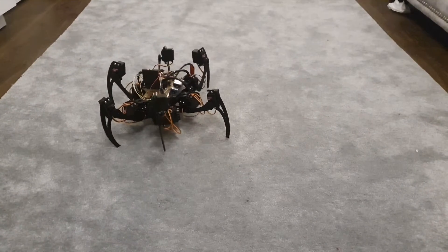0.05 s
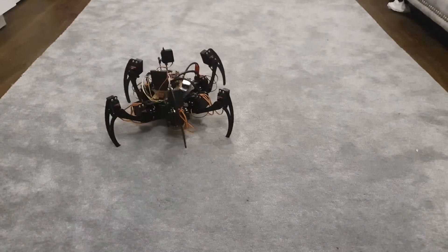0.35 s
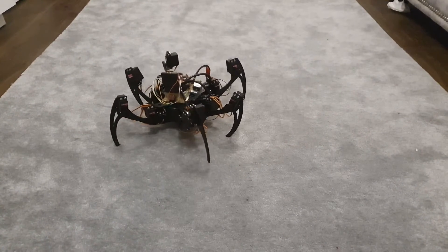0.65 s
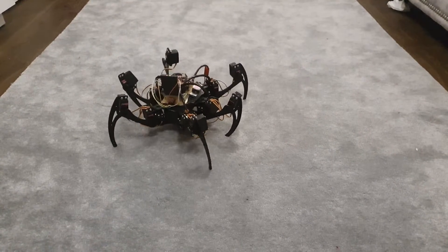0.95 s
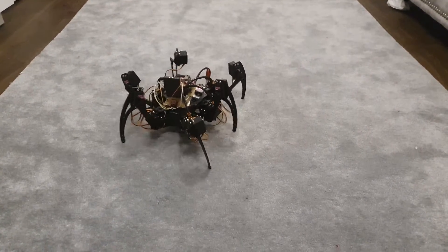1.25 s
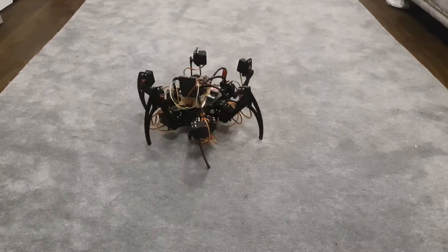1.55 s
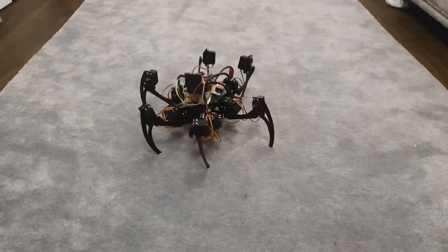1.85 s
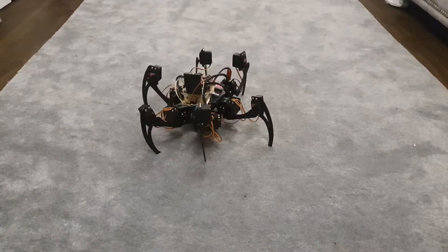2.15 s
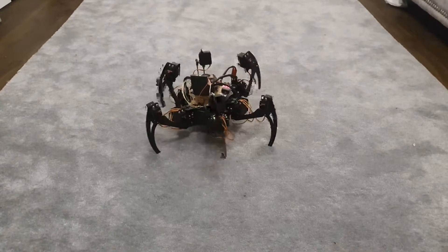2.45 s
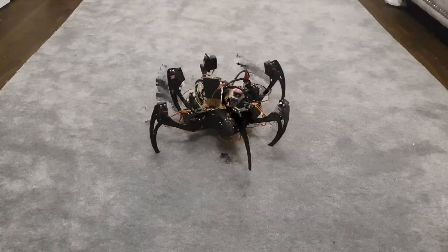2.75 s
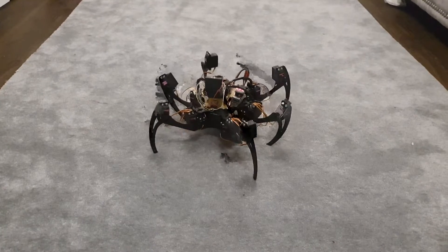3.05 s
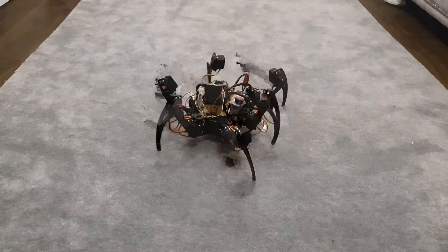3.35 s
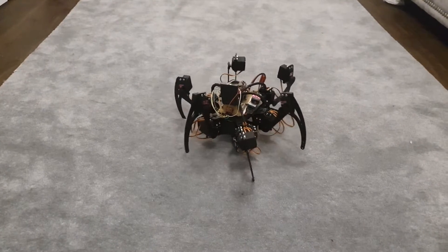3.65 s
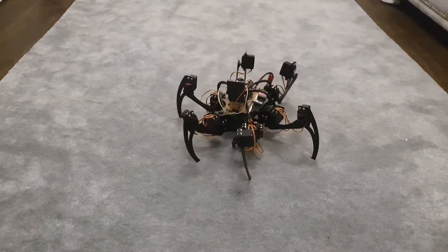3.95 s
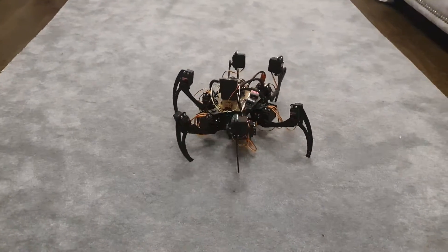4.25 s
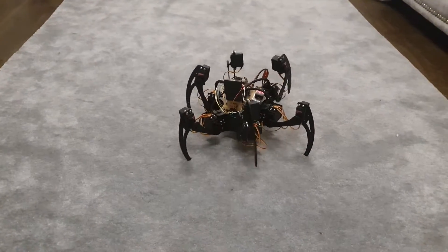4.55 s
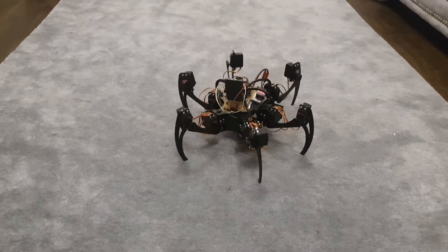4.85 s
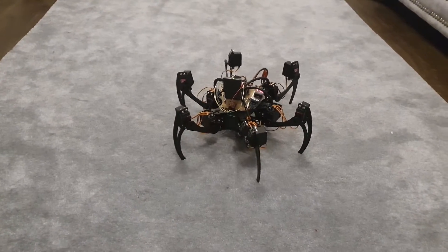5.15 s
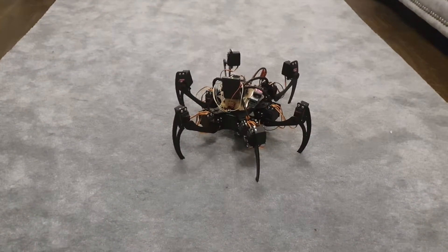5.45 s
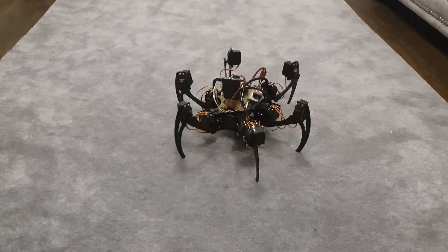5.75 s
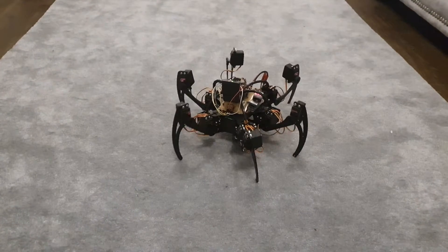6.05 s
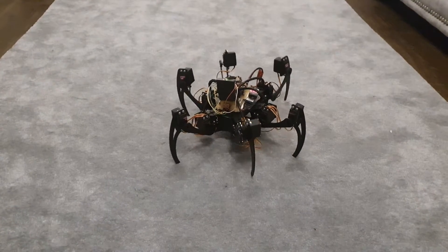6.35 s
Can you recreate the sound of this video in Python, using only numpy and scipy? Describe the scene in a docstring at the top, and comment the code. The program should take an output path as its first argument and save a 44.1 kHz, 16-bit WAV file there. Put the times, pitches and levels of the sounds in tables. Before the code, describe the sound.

A walking robot's servos whir in gritty surges, with light ticks and soft footfalls, halting for a second before resuming.

```python
"""Small motors rasp and whine as a six-legged robot walks over a mat in a living room.
It halts for a second, then steps off again. The rasp is gear teeth rattling in the small cases
of its servos, the motors that move the legs. Feet tick, a joint creaks, and twice the feet land
hard enough to set the floor booming. A faint hum fills the room."""
import sys
import numpy as np
from scipy import signal
from scipy.fft import rfft, irfft
from scipy.io import wavfile
from scipy.ndimage import uniform_filter1d, map_coordinates

SR = 44100
rng = np.random.default_rng(int(sys.argv[2]) if len(sys.argv) > 2 else 0)


def transcribe(signal):
    """Save signal, clipped to [-1, 1], as a 16-bit WAV file at the path in sys.argv[1]."""
    frames = np.atleast_2d(signal).T
    limited = np.clip(frames, -1, 1)
    pcm = np.round(limited * 32767).astype(np.int16)
    wavfile.write(sys.argv[1], SR, pcm)


N = 282240
T = np.arange(N) / SR
HZ = np.maximum(np.fft.rfftfreq(N, 1 / SR), 1)


def from_db(db):
    """Turn decibels into a number to multiply a sound by."""
    return 10 ** (np.asarray(db) / 20)


def unit_power(x):
    """Scale a sound so that its average power is 1."""
    return x / np.sqrt(np.mean(x ** 2) + 1e-20)


def over_time(rows):
    """Join a table's points in time with straight lines, one curve per column."""
    times_s, *columns = np.transpose(rows)
    return [np.interp(T, times_s, column) for column in columns]


def over_hz(points):
    """Join a table's points to get a value at every frequency."""
    hz, value = np.transpose(points)
    return np.interp(np.log(HZ), np.log(hz), value)


def colour(x, gain):
    """Turn each frequency of a sound up or down."""
    return irfft(rfft(x) * gain, N)


def drift(rate_hz):
    """A smooth random wobble, about 1 in size."""
    r = np.exp(-2 * np.pi * rate_hz / SR)
    white = rng.standard_normal(N + SR // 2)
    return unit_power(signal.lfilter([1], [1, -2 * r, r * r], white)[-N:])


def ring(blows, pitch_hz, fade_s):
    """Each blow starts a tone that dies away by 60 dB in fade_s."""
    r, w = from_db(-60 / (fade_s * SR)), 2 * np.pi * pitch_hz / SR
    return signal.lfilter([0, np.sin(w)], [1, -2 * r * np.cos(w), r * r], blows + 1e-18)


def glide(rows, flutter, pitch_ratio=1):
    """An unsteady tone that follows rows of time_s, pitch_hz, level_db."""
    hz, db = over_time(rows)
    sounding = (T > rows[0][0]) & (T < rows[-1][0])
    unsteady_hz = pitch_ratio * hz * (1 + flutter * drift(300))
    return sounding * from_db(db) * np.sin(2 * np.pi * np.cumsum(unsteady_hz) / SR)


def two_ears(mid, side, likeness):
    """Mix two unrelated sounds into left and right: likeness 0 is unrelated, 1 nearly the same."""
    likeness = np.clip(likeness, -.99, .99)
    return colour(mid, np.sqrt(1 + likeness)) + colour(side, np.sqrt(1 - likeness)) * [[1], [-1]]


def noise(spectrum, likeness):
    """Stereo noise of power 1, shaped by a table of frequencies and levels."""
    white = two_ears(*rng.standard_normal((2, N)), likeness)
    return unit_power(colour(white, from_db(over_hz(spectrum))))


# The tone of the still room: frequency_hz, relative_db
AIR_SPECTRUM = [(30, -14), (55, 0), (130, -6), (200, -7), (300, -15), (500, -19.5), (900, -19.5),
                (1400, -18), (2150, -14), (3000, -19), (4500, -22), (7500, -29.5), (10500, -27.5),
                (14000, -29)]

def still_air():
    """The soft, even hush of the room."""
    return from_db(-80.5) * noise(AIR_SPECTRUM, likeness=0.04)


def room_hum(walking, pitch_hz=92):
    """A low, wavering hum that swells while the robot walks."""
    level = from_db(-86.5) + from_db(-77.5) * walking * (1 + .7 * drift(2.1))
    return level * np.sin(2 * np.pi * pitch_hz * T + .7 * drift(12))


def room(x, echo_db, fade_s=0.28):
    """Add the many echoes off the walls, different at each ear."""
    t = T[:SR // 2]
    tail = rng.standard_normal((2, len(t))) * from_db(-60 * t / fade_s) * (t > .004)
    tail /= np.sqrt(np.sum(tail ** 2, axis=1, keepdims=True))
    return x + from_db(echo_db) * signal.fftconvolve(x * np.ones((2, 1)), tail, axes=1)[:, :N]


def moving_room(x, echo_db, places=4):
    """The echoes change as the robot moves from place to place."""
    position = T / T[-1] * (places - 1)
    nearness = [np.clip(1 - np.abs(position - k), 0, 1) for k in range(places)]
    return x + sum(np.sqrt(near) * (room(x, echo_db) - x) for near in nearness)


# The tone of the shaking floor: frequency_hz, relative_db
RUMBLE_SPECTRUM = [(20, -20), (45, 5.5), (70, 32), (95, 37.5), (125, 18), (200, 14), (300, -90), (600, -93)]

def floor_rumble(walking):
    """The walking frame shakes the floor unevenly."""
    shaking = from_db(3.5 * drift(10))
    return from_db(-72) * walking * noise(RUMBLE_SPECTRUM, likeness=0.7) * shaking


def frame_sway(halt_s=4.9):
    """The stopped frame rocks on its legs with a low tone that dies away."""
    jolt = np.arange(N) == round(halt_s * SR)
    return from_db(-52) * ring(jolt, pitch_hz=68, fade_s=.95)


# The course of one creak: time_s, pitch_hz, level_db
CREAK_CURVE = [(.15, 405, -92), (.2, 422, -73), (.27, 418.5, -65), (.36, 429, -79), (.43, 420, -100)]

def joint_creak():
    """A leg joint creaks briefly."""
    return glide(CREAK_CURVE, flutter=0.024)


# Feet landing on the mat: start_s, push_db, sharpness_hz
LANDINGS = [(.343, -70, 1515), (.375, -68.5, 895), (0.827, -42, 500), (0.842, -32.5, 450),
            (.849, -33, 410.7), (0.862, -35, 407), (0.88, -38, 121), (0.936, -44, 500),
            (3.139, -61.5, 2500), (3.151, -66, 900), (1.038, -40.5, 71.55), (4.102, -37, 54.6),
            (4.127, -41, 55.6), (4.19, -77, 500), (4.821, -39.5, 92), (4.865, -53, 900),
            (4.888, -43.5, 1300), (4.9, -38.5, 250), (4.935, -37, 210)]
# The notes that frame and floor ring at: pitch_hz, gain_db, fade_s
FLOOR_NOTES = [(88, -10, 0.082), (116.7, -11.5, 0.06), (166, -10, 0.062), (210, -14.5, 0.22),
               (295, -8, 0.083), (346, -12.5, 0.045), (402, -7, 0.025), (500, -11.5, 0.034),
               (647, -3, 0.032), (850, -5.5, .045), (965, -5.5, 0.023), (1210, 0.5, 0.024)]

def footfalls(scuff_size=.05, scuff_s=.012):
    """A padded blow, and a scuff as the foot takes weight, set frame and floor ringing."""
    push, t = np.zeros(N), T[:SR // 6]
    scuff_shape = scuff_size * np.sqrt(t / scuff_s) * np.exp(-t / scuff_s)
    for start_s, push_db, sharpness_hz in LANDINGS:
        blow = (t == 0) + scuff_shape * rng.standard_normal(len(t))
        padding = signal.butter(2, sharpness_hz, fs=SR, output="sos")
        at = round(start_s * SR)
        push[at:at + len(t)] += from_db(push_db) * signal.sosfilt(padding, blow)[:N - at]
    return sum((-1) ** k * from_db(gain_db) * ring(push, pitch_hz, fade_s)
               for k, (pitch_hz, gain_db, fade_s) in enumerate(FLOOR_NOTES))


# Feet and joints ticking: start_s, level_db, lowest_hz
PLASTIC_TICKS = [(.343, -38, 1200), (.939, -37, 1100), (2.876, -43, 3000), (3.141, -37, 1300),
                 (3.150, -39, 1100), (3.343, -39, 3800), (3.557, -38, 3800), (3.734, -38, 3800),
                 (3.752, -40, 3800)]

def ticks(fade_s=.012, highest_hz=7000):
    """Hard plastic parts knock together with a brief, bright crack."""
    out, grit = 0, rng.standard_normal(N)
    for start_s, level_db, lowest_hz in PLASTIC_TICKS:
        crack = from_db(level_db - 60 * np.clip(T - start_s, 0, 1) / fade_s) * (T >= start_s) * grit
        band = signal.butter(2, [lowest_hz, highest_hz], "band", fs=SR, output="sos")
        out = out + signal.sosfilt(band, crack + 1e-18 * grit)
    return out


# One motor swinging a leg at full speed: start_s, length_s, top_pitch_hz, level_db
LEG_SWINGS = [(2.14, .30, 2347, -56.5), (2.2, 0.2, 2550, -65), (2.791, .14, 2376, -56),
              (3.928, 0.088, 2385, -57), (4.30, .22, 2320, -58.5), (4.34, 0.17, 2510, -56.5)]

def motor_whine(pitch_droop=0.06, second_gear_db=-2):
    """A motor speeds up and slows down; a second gear stage whines about half an octave higher."""
    out, arc = 0, np.linspace(-1, 1, 15)  # -1 is the start of the swing, 1 its end
    for start_s, length_s, top_pitch_hz, level_db in LEG_SWINGS:
        time_s = start_s + length_s * (arc + 1) / 2
        pitch_hz = top_pitch_hz * (1 - pitch_droop * arc ** 2)
        curve = np.transpose([time_s, pitch_hz, level_db - 20 * arc ** 4])
        out = out + glide(curve, flutter=.04)
        out = out + from_db(second_gear_db) * glide(curve, flutter=.04, pitch_ratio=1.45)
    return out


def move(start_s, rise_s, hold_s, fall_s, surge_db=0, first_command_s=.06, command_gap_s=.0669):
    """A servo eases in, holds and runs down, surging each time it is told a new position."""
    t = T - start_s
    surge = from_db(surge_db * np.cos(2 * np.pi * (T - first_command_s) / command_gap_s))
    run_up = np.sin(np.pi / 2 * np.clip(t / rise_s, 0, 1)) ** 2
    run_down = np.exp(-np.clip((t - rise_s - hold_s) / fall_s, 0, 10) ** 2)
    return run_up * surge * run_down


# Five kinds of move, each with: start_s, rise_s, hold_s, effort_db, growl_db, hiss_db, ring_db
# Effort is the rasp's level. Slow-gear growl, tooth hiss and case ring are relative to it.
STRIDE_MOVES = [(-.06, .05, .93, -50, -13, -1, -16), (.97, .10, .91, -48.5, -14.5, -2.5, -22),
                (2.073, .008, 1, -49.5, -13, -2.5, -6), (3.13, .03, 0.37, -49.5, -13.5, -1.5, -17),
                (3.59, .07, .11, -47.5, -16, -5, -39), (4.21, .03, .63, -49, -21.5, -8, -11.5),
                (6.042, .06, 0.17, -53, -11, -4, -27), (6.355, .03, .05, -51, -21, -7, 4)]  # the standing legs push the body along
LIFT_MOVES = [(-.07, .13, .11, -43.5, -19, -8.5, -8), (1.02, .06, .07, -44, -18, -2, -14),
              (2.09, .12, .13, -42, -25, -9, -3), (3.17, .05, .30, -45.5, -17.5, -8.5, -9),
              (4.28, .04, .2, -43, -18.5, -6.5, -2.5)]  # three legs lift and swing forward
LOWER_MOVES = [(.50, .30, .11, -46, -10, -5.5, -10), (1.65, .16, .17, -47.5, -8.5, -6, -18),
               (2.65, .25, .14, -46.5, -14, -3, -14), (3.77, .19, .18, -46.5, -8.5, -2.5, -31)]  # they reach down to the mat again
JERK_MOVES = [(1.03, .035, .005, -44.5, -15.5, 0.5, -23), (3.182, .028, .008, -42.5, -15, -1, -12),
              (4.68, .065, .13, -43.5, -7, -2, -13), (4.74, .08, .05, -39, -10.5, -2.5, -24.5),
              (5.836, .08, .027, -40, -11.5, -2, -26), (5.93, .04, .04, -46.5, -6.5, 1, -15),
              (6.04, .165, .01, -45, -8.5, -2, -34), (6.22, 0.024, .04, -50, -5.5, -1, -8)]  # quick jerks to set off or square up
HOLD_MOVES = [(-.1, .05, 4.92, -59, -9, -5, -14.5), (5.74, .08, .03, -82, -5, 4, -20),
              (5.85, .08, .5, -58, -28, -9, -19)]  # the motors keep adjusting their position between moves
STRIDE_FALL_S = .055

def leg_work(idle_db=-100):
    """Add up the power of all moves: effort in dB, then growl, hiss and ring relative to it."""
    # moves, fall_s, surge_db
    kinds = [(STRIDE_MOVES, STRIDE_FALL_S, 0.33), (LIFT_MOVES, .15, 0.16), (LOWER_MOVES, .045, 1.8),
             (JERK_MOVES, .05, 0), (HOLD_MOVES, STRIDE_FALL_S, 0)]
    power = from_db(idle_db) ** 2
    for moves, fall_s, surge_db in kinds:
        for start_s, rise_s, hold_s, effort_db, *tone_db in moves:
            effort = from_db(effort_db) * move(start_s, rise_s, hold_s, fall_s, surge_db)
            power = power + np.outer(from_db([0, *tone_db]), effort) ** 2
    total_db, *parts_db = 10 * np.log10(power)
    return total_db, *(parts_db - total_db)


def weight_shift():
    """How hard the standing legs press on the floor, 1 at the strongest push."""
    push = sum(from_db(effort_db) * move(start_s, rise_s, hold_s, STRIDE_FALL_S)
               for start_s, rise_s, hold_s, effort_db, *_ in STRIDE_MOVES)
    return push / push.max()


def turning_cases(x, patchy_db=1.9):
    """As the legs turn, their cases face to and fro: narrow bands of the rasp come and go."""
    cells = signal.stft(x, nperseg=512)[2]
    patches = rng.standard_normal(cells.shape[1:])
    for axis, width in ((0, 3), (0, 2), (1, 16), (1, 9)):  # smooth over frequency, then time
        patches = uniform_filter1d(patches, width, axis=axis)
    gain = unit_power(from_db(patchy_db * unit_power(patches)))
    return signal.istft(cells * gain, nperseg=512)[1][:, :N]


def walking_past(x, start_ms=-0.056, end_ms=0.065):
    """Walking from left to right, the robot is heard later and later by the left ear."""
    lag_s = np.linspace(start_ms, end_ms, N) / 1000
    return np.array([map_coordinates(x[0], [(T - lag_s) * SR], order=5), x[1]])


def load_jolts(per_s=280, settle_s=0.01):
    """The load on the gears jumps at random and settles again."""
    kicks = (rng.random(N) < per_s / SR) * rng.uniform(0.2, 1, N)
    load = signal.lfilter([1], [1, -np.exp(-1 / (settle_s * SR))], kicks + 1e-18)
    return unit_power(load - load.mean())


def gear(speed, teeth_per_s, wander=.12, slack=.13, uneven_db=0.5, rough_db=1.5, rub=0.16, teeth=11):
    """Each tooth strikes once a turn, early or late because the gears are loose, and then rubs."""
    timing = np.exp(wander * drift(5) + slack * drift(400))
    teeth_passed = np.cumsum(teeth_per_s * speed * timing) / SR
    tooth = teeth_passed.astype(int)
    tooth_force = from_db(uneven_db * rng.standard_normal(teeth)[tooth % teeth])
    roughness = from_db(rough_db * np.clip(rng.standard_normal(N), -2, 2))[tooth]
    strikes = np.diff(tooth, prepend=0)
    rubbing = rub * (1 - teeth_passed % 1) ** 2 * rng.standard_normal(N)
    return unit_power(tooth_force * roughness * (strikes + rubbing))


def three_legs(speed, chatter_db):
    """Three servos run at unrelated speeds and chatter under their load."""
    gears = sum(gear(speed, teeth_per_s=1150 * rng.uniform(.7, 1.3)) for _ in range(3))
    return unit_power(gears * from_db(chatter_db * np.minimum(load_jolts(), 2.5)))


# How a gearbox shapes the sound of its teeth: frequency_hz, relative_db
GEARBOX_SPECTRUM = [(600, -137.5), (1050, -51), (1400, -22), (1900, -15.5), (2400, -11), (2900, -13),
                    (3700, -7), (4700, -2.5), (5750, 1), (6900, -1), (8000, -8.5), (10000, -4),
                    (11800, -8.5), (14400, -9.5)]
# The notes that the servo cases ring at: pitch_hz, width_hz, relative_db
CASE_NOTES = [(4940, 90, -15), (5530, 190, -15), (5580, 1000, 2.5), (5930, 310, -5.5)]
# Which ear hears more of the gears: frequency_hz, left_minus_right_db
GEAR_BALANCE = [(1200, 6.92), (1800, 7), (2800, 3.9), (4200, 0.96), (6400, -1.5), (8000, 1.46), (9800, 3.5),
                (12000, -1), (14500, -6)]
# How alike the gears sound at the two ears: frequency_hz, likeness (0 to 1)
GEAR_LIKENESS = [(1200, 0.36), (2100, 0.76), (3400, 0.43), (5500, 0.31), (8000, 0.092), (14000, 0.11)]
# Where the busy legs are: time_s, left_minus_right_db
LEG_POSITION = [(0, -1.5), (2.0, -2), (2.2, -1), (3.0, -2), (4.5, -2), (6.4, -3)]

def servos(effort_db, growl_db, hiss_db, ring_db, growl_below_hz=3474, hiss_above_hz=9260):
    """Tooth strikes sound through the gearboxes; harder work turns the gears faster."""
    speed = from_db(.15 * (effort_db - np.median(effort_db)))
    teeth = two_ears(three_legs(speed, chatter_db=1.58), three_legs(speed, chatter_db=1.46),
                     over_hz(GEAR_LIKENESS))
    ear_split = [[.5], [-.5]]
    teeth = colour(teeth, from_db(over_hz(GEARBOX_SPECTRUM) + over_hz(GEAR_BALANCE) * ear_split))
    low = 1 / (1 + (HZ / growl_below_hz) ** 12)
    high = 1 / (1 + (hiss_above_hz / HZ) ** 12)
    # the middle frequencies pass through the cases and make them ring
    rasp = colour(teeth, 1 - low - high)
    case_gain = sum(from_db(relative_db) / (1 + (2 * (HZ - pitch_hz) / width_hz) ** 2)
                    for pitch_hz, width_hz, relative_db in CASE_NOTES)
    ringing = from_db(ring_db) * unit_power(colour(rasp, case_gain))
    cases = from_db(0.26) * (unit_power(rasp) + ringing) / (1 + from_db(ring_db))
    growl = from_db(growl_db - 0.61) * unit_power(colour(teeth, low))
    hiss = from_db(hiss_db + 0.9) * unit_power(colour(teeth, high))
    balance = from_db(over_time(LEG_POSITION)[0] * ear_split)
    return from_db(effort_db) * (growl + cases + hiss) * balance


def scene():
    """The robot and its steps echo in the room, over rumble, hum and still air."""
    motors = turning_cases(servos(*leg_work())) + motor_whine()
    robot = walking_past(motors) + ticks()
    steps = (footfalls() + joint_creak()) * from_db([[-.8], [.8]])  # a little to the right
    walking = weight_shift()
    background = floor_rumble(walking) + room_hum(walking) + still_air()
    return background + frame_sway() + moving_room(robot, echo_db=-6) + room(steps, echo_db=-1)


def record(dry, cutoff_hz=14560):
    """Cut away the very highest treble, steeply."""
    return colour(dry, 1 / np.sqrt(1 + np.minimum(HZ / cutoff_hz, 2) ** 700))


dry = scene()
out = record(dry)
transcribe(out)
```